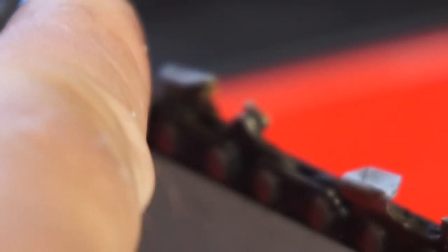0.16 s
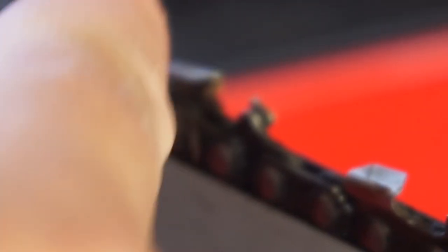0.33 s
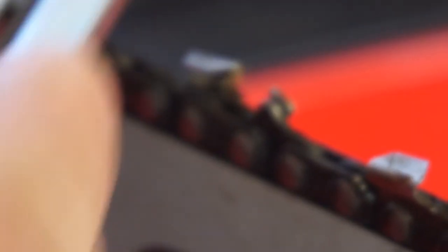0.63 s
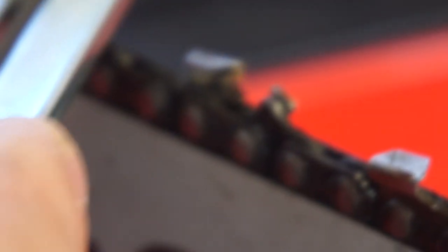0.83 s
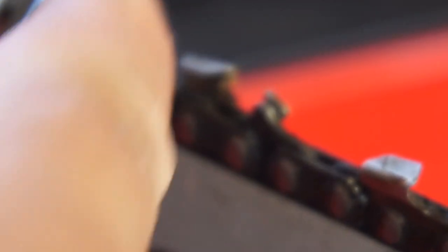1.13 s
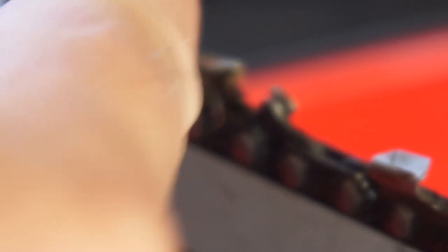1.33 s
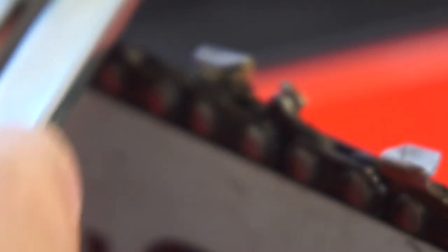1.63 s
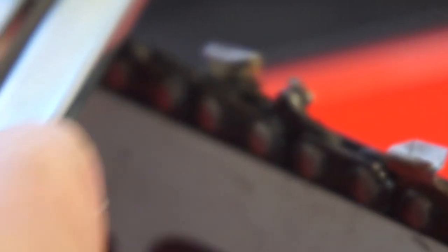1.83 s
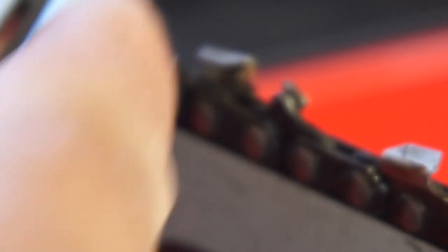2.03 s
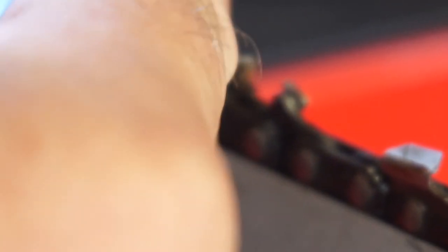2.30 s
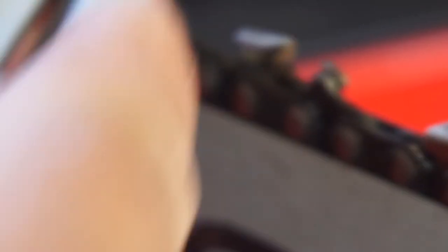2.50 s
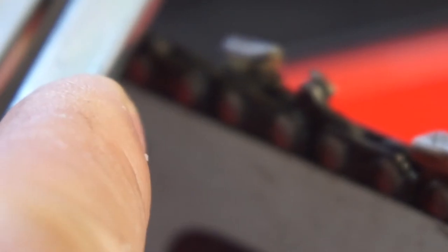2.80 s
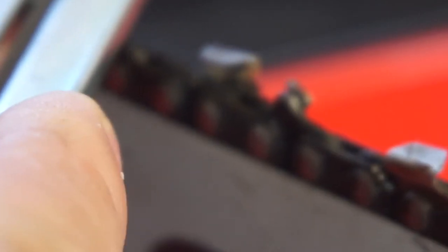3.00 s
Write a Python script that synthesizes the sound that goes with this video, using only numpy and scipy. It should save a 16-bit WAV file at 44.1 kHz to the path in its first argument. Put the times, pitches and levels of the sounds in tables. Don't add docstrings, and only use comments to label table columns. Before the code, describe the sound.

Metal file scraping a chainsaw tooth, three bright harsh pushes with lighter dragging returns between.

```python
import sys
import numpy as np
from scipy import signal
from scipy.fft import rfft, irfft
from scipy.io import wavfile

SR = 44100
rng = np.random.default_rng(int(sys.argv[2]) if len(sys.argv) > 2 else 0)


def volts_from_db(level):
    exponent = np.asarray(level, float) / 20
    return 10 ** exponent


def materialize(psi):
    bounded = np.clip(np.atleast_2d(psi).T, -1, 1)
    quanta = np.round(bounded * 32767).astype(np.int16)
    wavfile.write(sys.argv[1], SR, quanta)


N = 138915
CUTOFF_HZ = 10960


def rms_one(x):
    return x / np.sqrt(np.mean(x ** 2) + 1e-20)


def at_hz(points, hz):
    table_hz, value = np.transpose(points)
    return np.interp(np.log(hz + 1e-9), np.log(table_hz), value)


def drift(rate_hz):
    r = np.exp(-32 * np.pi * rate_hz / SR)
    slow = signal.lfilter([1], [1, -2 * r, r * r], rng.standard_normal(N // 16 + 3002))[3000:]
    return np.interp(np.arange(N) / 16, np.arange(len(slow)), rms_one(slow))


def ring(x, hz, width_hz):
    r = np.exp(-np.pi * width_hz / SR)
    poles = [1, -2 * r * np.cos(2 * np.pi * hz / SR), r * r]
    return signal.lfilter([(1 - r * r) / 2, 0, (r * r - 1) / 2], poles, x + 1e-18)


def band(x, order, edges_hz, kind):
    return signal.sosfilt(signal.butter(order, edges_hz, kind, fs=SR, output="sos"), x)


def colour(x, spectrum):
    cepstrum = irfft(np.log(volts_from_db(at_hz(spectrum, np.linspace(0, SR / 2, 1025)))))
    cepstrum[1:1024] *= 2
    cepstrum[1025:] = 0
    response = irfft(np.exp(rfft(cepstrum)))
    return signal.fftconvolve(x, response[None], axes=1)[:, :N]


def pair(x, alike):
    other_paths = x * rng.choice([-1, 1], N)
    return np.array([x, alike * np.roll(x, 1) + np.sqrt(1 - alike ** 2) * other_paths])


# (frequency [Hz], level [dB per Hz])
SHOP_TONE = [(15, -74.5), (25, -36.5), (290, -12.5), (594, -9.5), (728, -8), (1180, -9), (1570, -10),
             (1870, -19), (11200, -26), (14600, -64), (22000, -120)]
# (frequency [Hz], likeness [0-1])
SHOP_LIKENESS = [(30, 0.5), (150, 0.84), (700, 0.52), (2000, 0), (8000, 0)]
SHOP_DB = -52
HUM_HZ, HUM_DB = 129, -79.5


def shop():
    hz = np.fft.rfftfreq(N, 1 / SR)
    mid, side = rfft(rng.standard_normal((2, N))) * volts_from_db(at_hz(SHOP_TONE, hz))
    alike = at_hz(SHOP_LIKENESS, hz)
    spread = np.sqrt(1 - alike) * side * np.array([[1], [-1]])
    air = irfft(np.sqrt(1 + alike) * mid + spread, N)
    low_drone = ring(air * volts_from_db(9.9 * drift(19)), 731, 21)
    air = air + low_drone
    air = air + shop_drone(air)
    hum = volts_from_db(HUM_DB + 7.6 * drift(0.73)) * np.sin(2 * np.pi * HUM_HZ * np.arange(N) / SR)
    return volts_from_db(SHOP_DB + 0.13 * drift(3.3)) * rms_one(air) + hum


def shop_drone(air):
    return -ring(air * volts_from_db(6.8 * drift(6.5)), 1036, 42)


ROOM_DB, ROOM_T60_S = -15, 0.39


def space(x):
    t = np.arange(SR // 2) / SR
    tail = rng.standard_normal((2, len(t))) * (t > .004) * volts_from_db(-60 * t / ROOM_T60_S)
    tail = tail / np.sqrt(np.sum(tail[0] ** 2))
    return volts_from_db(ROOM_DB) * signal.fftconvolve(x, tail, axes=1)[:, :N]


# (start [s], length [s], level [dB])
ROCKS = [
    (0.105, 0.056, -56),
    (0.306, 0.14, -54.5),
    (0.456, 0.16, -50.5),
    (1.251, 0.037, -59),
    (1.39, 0.33, -57),
    (2.24, 0.056, -63),
    (2.393, 0.038, -53.5),
    (2.49, 0.073, -53.5),
]
ROCK_HZ, ROCK_WIDTH_HZ = 203.4, 13


def rocks():
    t = np.arange(N) / SR
    swell = sum(volts_from_db(db) * np.sin(np.pi * np.clip((t - s) / length, 0, 1)) ** 2 for s, length, db in ROCKS)
    boom = ring(rng.standard_normal(N), ROCK_HZ, ROCK_WIDTH_HZ)
    return swell * rms_one(ring(boom, ROCK_HZ, 10 * ROCK_WIDTH_HZ))


TEETH_PER_S, TOOTH_SPREAD_DB = 2000, 3


def teeth(smooth, clump_db):
    sizes = volts_from_db(TOOTH_SPREAD_DB * np.minimum(rng.exponential(1, N), 6)) * rng.choice([-1, 1], N)
    bites = sizes * (rng.random(N) < TEETH_PER_S / SR)
    grind = smooth * rng.standard_normal(N)
    return rms_one((rms_one(bites) + grind) * volts_from_db(clump_db * drift(60)))


# (frequency [Hz], width [Hz], level [dB])
BAR_MODES = [(417, 180, -8), (540, 42, -1), (634.6, 30.3, 0.5), (741.4, 24, -0.5), (810.5, 23, -4.5),
             (1131, 120, -4.5), (1676, 1200, -12.5)]
BAR_ALIKE = 0.94


def bar(gain):
    x = pair(teeth(smooth=0.63, clump_db=0.85) * gain, BAR_ALIKE)
    thrum = 0
    for k, (hz, width, db) in enumerate(BAR_MODES):
        thrum = thrum + (-1) ** k * volts_from_db(db) * ring(x * volts_from_db(2 * drift(3.1)), hz, width)
    return band(volts_from_db(18) * thrum, 2, 260, "high")


RASP_ALIKE = 0.5
LINKS_DB, LINKS_T60_S = -1.5, 0.047
GRIP_WANDER_DB, RING_WIDENING = 3, 1.33


def steel(x, rasp, rings):
    direct, loose, struck = (pair(x * rng.choice([-1, 1], N), RASP_ALIKE) for _ in range(3))
    rung = 0
    for hz, width, db in rings:
        width = RING_WIDENING * width
        driven = struck * volts_from_db(db + GRIP_WANDER_DB * drift(8.7))
        rung = rung + ring(ring(driven, hz, width), hz, width)
    links = rng.standard_normal((1, 2048)) * volts_from_db(-60 * np.arange(2048) / SR / LINKS_T60_S)
    links = links / np.sqrt(np.sum(links ** 2))
    jingle = signal.fftconvolve(colour(loose, rasp) + 0.56 * rung, links, axes=1)[:, :N]
    return volts_from_db(4) * (colour(direct, rasp) + rung + volts_from_db(LINKS_DB) * jingle)


def levels(rows):
    s, db, thrum_db = np.transpose(rows)
    t = np.arange(N) / SR
    inside = (t > s[0]) & (t < s[-1])
    return np.array([inside * volts_from_db(np.interp(t, s, db)), inside * volts_from_db(np.interp(t, s, db + thrum_db))])


# (start [s], length [s], level [dB], thrum relative to it [dB], file's chime [dB])
TOUCHES = [(0.101, 0.044, -37, -5.5, -19), (0.26, 0.012, -55, -15, -11), (1.817, 0.026, -45.5, -11, -4),
           (1.855, 0.025, -43.5, -11, 6), (1.897, 0.0092, -44, -28, 8), (1.935, 0.053, -39.5, -21.5, 8),
           (1.991, 0.014, -44, -37, 4.5), (2.03, .055, -41.5, -14, -11), (2.123, 0.032, -40, -16.5, 3.5),
           (2.169, 0.013, -52.5, -15, -10), (2.218, 0.011, -40.5, -23, -1), (2.241, 0.034, -47.5, -0.5, -3),
           (2.687, 0.016, -46.5, -6, -3), (2.876, 0.038, -48.5, -8, -4), (3.14, 0.049, -42.5, -11, -7)]
TOUCH_ATTACK_S, TOUCH_RELEASE_DB_PER_S = 0.0029, 861
PULL_CHIME_DB = 0


def touches():
    t = np.arange(N) / SR
    rasp, thrum, chime_db = np.zeros(N), np.zeros(N), np.full(N, PULL_CHIME_DB, float)
    for s, length, db, thrum_db, free_db in TOUCHES:
        release_db = TOUCH_RELEASE_DB_PER_S * np.clip(t - s - length, 0, 1)
        shape = np.clip((t - s) / TOUCH_ATTACK_S, 0, 1) * volts_from_db(db - release_db)
        rasp = rasp + shape
        thrum = thrum + shape * volts_from_db(thrum_db)
        chime_db[(t > s - .005) & (t < s + length + .015)] = free_db
    return np.array([rasp, thrum]), chime_db


CATCH_SPLIT_HZ = 7200

# (start [s], end [s], duller half [dB])
GRAZES = [
    (.09, 0.12, -14),
    (.125, 0.163, -13),
    (.25, .28, -1),
    (1.82, 1.928, -11.5),
    (2.68, 2.727, -7),
    (2.86, 2.936, -15),
    (3.12, 3.2, -16),
]


def graze(x):
    t = np.arange(N) / SR
    loss = sum((1 - volts_from_db(db)) * ((t > s) & (t < end)) for s, end, db in GRAZES)
    duller = signal.sosfiltfilt(signal.butter(2, CATCH_SPLIT_HZ, fs=SR, output="sos"), x)
    return x - loss * duller


# (time [s], level [dB], thrum relative to it [dB])
PULLS = [
    [(.285, -50.5, 3), (.31, -47, -3.5), (.375, -40.5, -7.5), (.42, -51, 1.5), (.445, -65, 5)],
    [(.865, -51, -4), (.92, -42, -8.5), (.98, -43, -13), (1.08, -47, -13), (1.11, -42, -19),
     (1.175, -44, -11), (1.195, -36, -3.5), (1.26, -42, -2), (1.305, -71, 15.5)],
]
# (frequency [Hz], level [dB per Hz])
PULL_RASP = [(150, -50), (1000, -8), (1900, -3), (2500, -2.5), (4400, -8), (5600, -4.5), (6400, -9),
             (7500, -6.5), (11000, -2)]
# (frequency [Hz], width [Hz], level [dB])
PULL_RINGS = [(1164, 150, 1), (1540, 80, 3.5), (2620, 97, 1.5), (3770, 260, -2.5), (5270, 410, -1),
              (7850, 530, 1.5), (10260, 630, -3.5)]
CHIME_HZ, CHIME_WIDTH_HZ, CHIME_DB = 4990, 180, 8


def pulls():
    touch, chime_db = touches()
    back, thrum = sum(levels(rows) for rows in PULLS) + touch
    rings = list(PULL_RINGS) + [(CHIME_HZ, CHIME_WIDTH_HZ, CHIME_DB + chime_db)]
    return graze(steel(teeth(smooth=0.53, clump_db=2) * back, PULL_RASP, rings)), thrum


# (time [s], peak level [dB], duller half relative to the bright [dB])
EARLY_CATCHES = [(0.1024, -40, -15), (0.1161, -33, -5), (0.2557, -46, -21), (0.2907, -41, -5),
                 (0.4677, -38, -1), (0.4853, -39, -2), (0.4977, -37, 2), (0.5189, -21, -5),
                 (0.5262, -22, -10), (0.5345, -19, -8), (0.5449, -28, -15), (0.5495, -27, -17),
                 (0.5582, -23, -8), (0.5698, -24, -10), (0.5908, -19, -6), (0.5983, -19, -16),
                 (0.611, -22, -7), (0.6299, -25, -11), (0.6594, -28, -17), (0.9245, -38, -5),
                 (0.9648, -42, 5), (0.9867, -40, -2), (1.0262, -38, -11), (1.1101, -34, -19),
                 (1.1755, -39, -4), (1.1872, -34, -12), (1.2046, -33, -7), (1.2175, -34, -9),
                 (1.2458, -37, -2), (1.3372, -46, -2), (1.3502, -36, 0), (1.3576, -36, -1),
                 (1.3704, -32, -2), (1.3756, -26, -4), (1.3794, -26, -4), (1.3957, -26, -3),
                 (1.4047, -28, -1), (1.412, -21, -3), (1.452, -23, -7), (1.482, -23, -18),
                 (1.6839, -34, -20)]
# (time [s], peak level [dB], duller half relative [dB])
LATE_CATCHES = [(1.8241, -43, -4), (1.8302, -41, -17), (1.9424, -38, 5), (1.9734, -34, -1),
                (2.0099, -38, -3), (2.0335, -39, -4), (2.0378, -45, 7), (2.0429, -39, -9),
                (2.0565, -39, -3), (2.0751, -37, -7), (2.0845, -37, -3), (2.1181, -38, -8),
                (2.1227, -35, -14), (2.1746, -44, -1), (2.1829, -45, -11), (2.208, -44, -11),
                (2.2226, -36, 2), (2.2511, -45, 2), (2.33, -45, -2), (2.3499, -35, -1), (2.3591, -35, -1),
                (2.3646, -33, -2), (2.3705, -20, -6), (2.3746, -18, -8), (2.3948, -28, -3),
                (2.4105, -28, -1), (2.4215, -23, -2), (2.4256, -25, 4), (2.4357, -19, -2),
                (2.4488, -21, -3), (2.4653, -24, 0), (2.4733, -17, -10), (2.4842, -21, -10),
                (2.4973, -26, -15), (2.5033, -28, -6), (2.5777, -27, -8), (2.5987, -37, 0),
                (2.6146, -34, -9), (2.6235, -36, -7), (2.6957, -36, -22), (2.8922, -41, -11)]
CATCH_DB, CATCH_RISE_S, CATCH_T60_S, CATCH_ABOVE_HZ = 17, 0.00044, 0.0035, 3730


def catches():
    rows = list(EARLY_CATCHES) + list(LATE_CATCHES)
    out, t = np.zeros(N + 512), np.arange(512) / SR
    decay = volts_from_db(-60 * t / CATCH_T60_S) * np.clip(t / CATCH_RISE_S, 0, 1)
    slips = rng.standard_normal((len(rows), 512)) * decay
    bright = band(slips, 3, [CATCH_SPLIT_HZ, CUTOFF_HZ], "band")
    bright = bright + volts_from_db(7) * ring(bright, 8270, 560)
    bright = bright + top_ring(bright)
    dull = band(slips, 2, [CATCH_ABOVE_HZ, CATCH_SPLIT_HZ], "band")
    file_rings = [(4760, 230, 5), (4080, 200, 5.5), (5300, 240, -8)]  # (Hz, width Hz, dB)
    dull = dull + sum(volts_from_db(db) * ring(dull, hz, width) for hz, width, db in file_rings)
    for (s, db, dull_db), high, low in zip(rows, bright, dull):
        i = int(s * SR)
        burst = rms_one(high) + volts_from_db(dull_db) * rms_one(low)
        out[i:i + 512] += volts_from_db(db + CATCH_DB) * burst / np.sqrt(len(t))
    x = out[:N]
    return np.array([x, 1.06 * np.roll(x, 1) + 0.32 * np.roll(x, 5)])


def top_ring(x):
    return volts_from_db(-3) * ring(x, 10200, 1000)


# (time [s], level [dB], thrum of the bar relative to it [dB])
PUSHES = [
    [(.465, -49.5, -2), (.5, -38.5, -2), (.525, -27.5, -6), (.555, -31.5, -4.5), (.595, -25.5, -6.5),
     (.64, -32.5, -3), (.74, -40.5, -1), (.78, -38.5, -8.5), (.815, -67, 17)],
    [(1.335, -51.5, 0.5), (1.36, -37.5, -1), (1.385, -29.5, -4), (1.42, -26, -3), (1.52, -31, -4),
     (1.59, -35, -4), (1.67, -33.5, -9.5), (1.69, -44, -3), (1.72, -69.5, 15)],
    [(2.345, -44, -4), (2.39, -32, -3), (2.44, -23, -7.5), (2.49, -31.5, -1.5), (2.55, -33.5, 0),
     (2.6, -39.5, -2), (2.63, -42, -2), (2.65, -61.5, 13), (2.68, -67.5, 7)],
]
# (frequency [Hz], level [dB per Hz])
PUSH_RASP = [(150, -32), (900, -6), (1400, -5.5), (3200, -8.5), (5000, -5), (6900, -5.5), (8000, -0.5),
             (11000, 0)]
# (frequency [Hz], width [Hz], level in push one [dB], push two [dB], push three [dB])
PUSH_RINGS = [(1650, 160, -20, -3, -2.5), (2320, 176, -9, -1.5, 0.5), (2666, 88, 0.5, -8, -5),
              (4200, 170, -0.5, -2.5, 2), (4777, 170, 6, 5, 5), (5320, 130, 0.5, 0, 0.5),
              (6104, 190, 3.5, -0.5, 3), (7460, 70, -12, 1.5, 4), (8100, 450, 4, -1, 3.5),
              (9820, 570, 0.5, 5, 0.5), (9800, 280, 6, 2.5, -3)]
RINGS_FOLLOW, FULL_PRESS_DB = 0.56, -29.5


def pushes():
    push, thrum = sum(levels(rows) for rows in PUSHES)
    which = np.searchsorted([rows[0][0] for rows in PUSHES[1:]], np.arange(N) / SR)
    press_db = RINGS_FOLLOW * (20 * np.log10(push + 1e-4) - FULL_PRESS_DB)
    rings = [(hz, width, np.array(dbs)[which] + press_db) for hz, width, *dbs in PUSH_RINGS]
    return steel(teeth(smooth=0.83, clump_db=1) * push, PUSH_RASP, rings), thrum


LEFT_DB = 4.5


def filing():
    push, push_thrum = pushes()
    pull, pull_thrum = pulls()
    tooth = (push + catches() + pull) * volts_from_db([[LEFT_DB / 2], [-LEFT_DB / 2]])
    return tooth + bar(push_thrum + pull_thrum) * volts_from_db([[1.6], [-1.6]]) + rocks()


def scene():
    work = filing()
    return work + space(work) + shop()


def band_limit(x):
    return signal.sosfilt(signal.butter(12, 12340, fs=SR, output="sos"), x)


def record(dry):
    cut = signal.sosfilt(signal.cheby1(22, 1, CUTOFF_HZ, fs=SR, output="sos"), dry)
    return band_limit(cut)


dry = scene()
out = record(dry)
materialize(out)
```